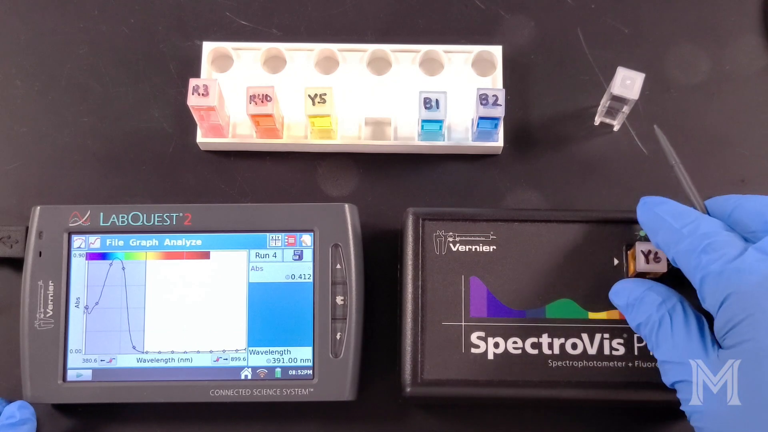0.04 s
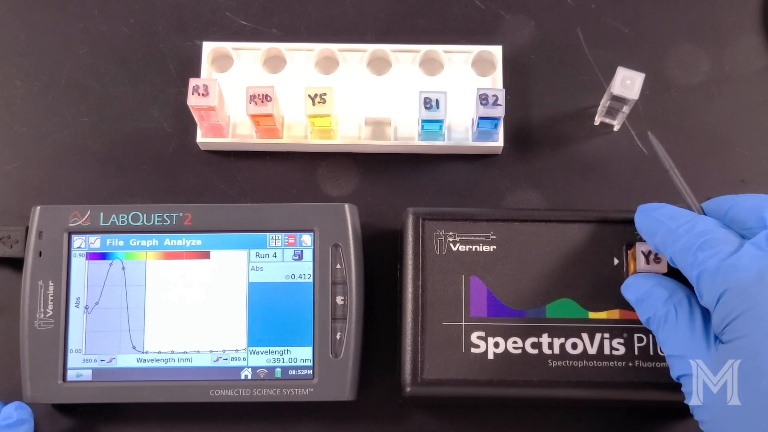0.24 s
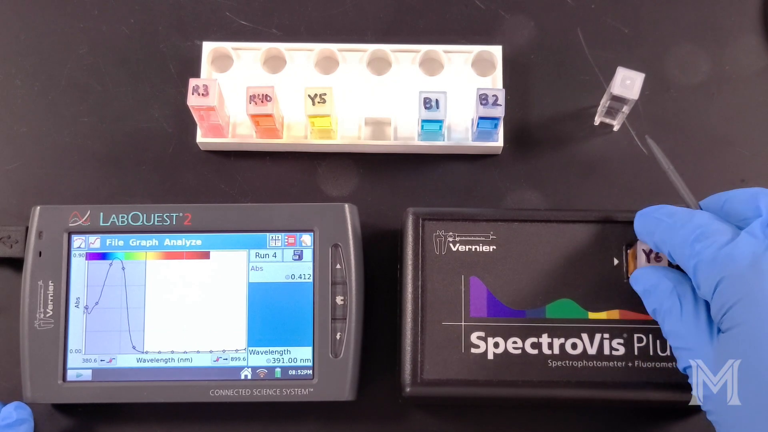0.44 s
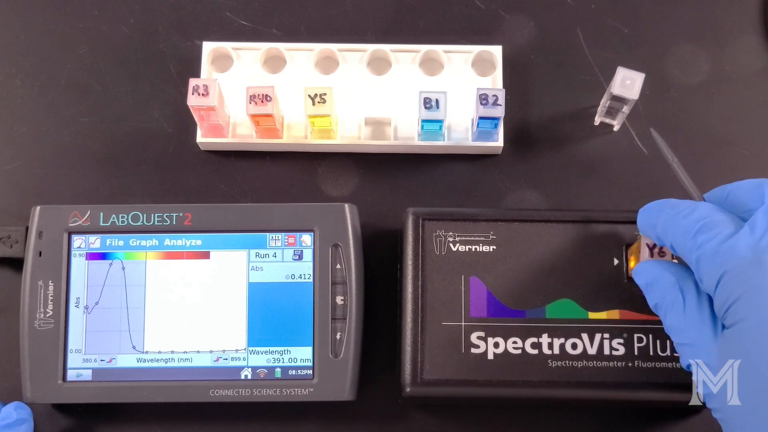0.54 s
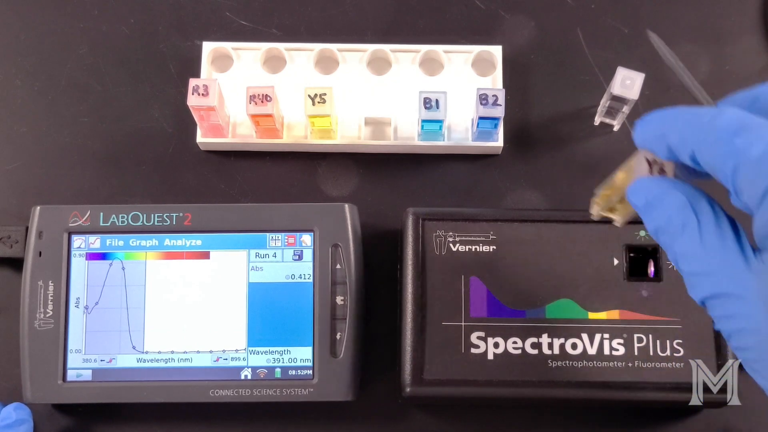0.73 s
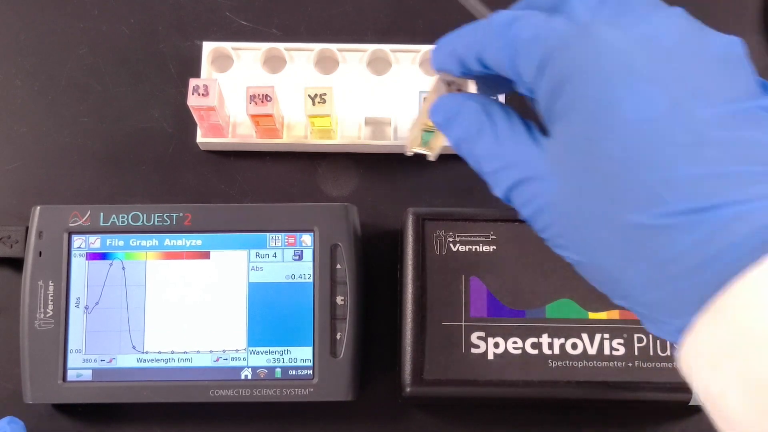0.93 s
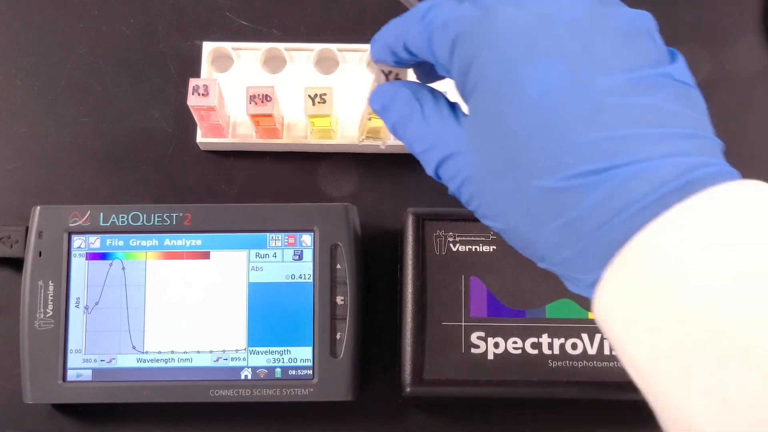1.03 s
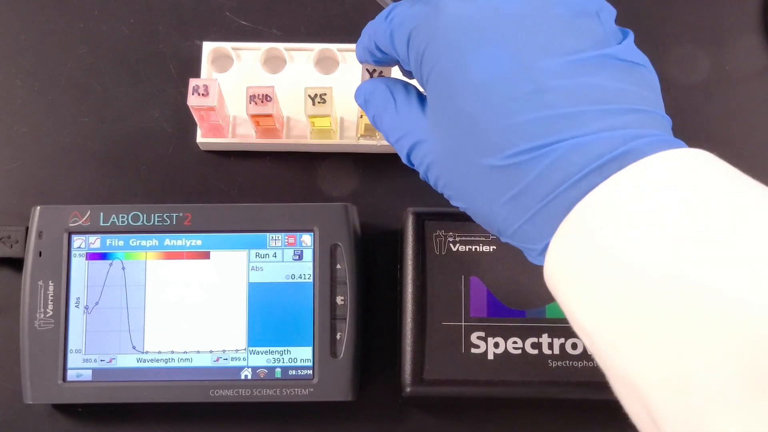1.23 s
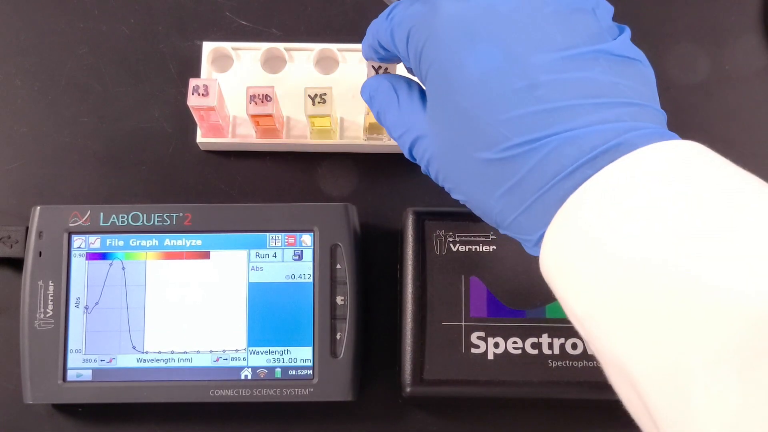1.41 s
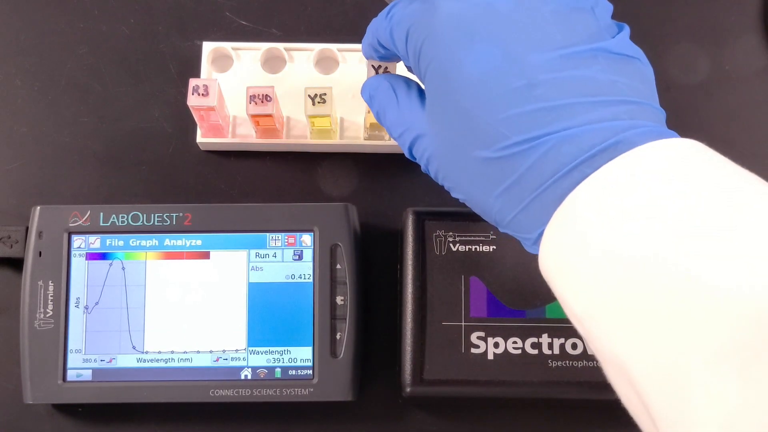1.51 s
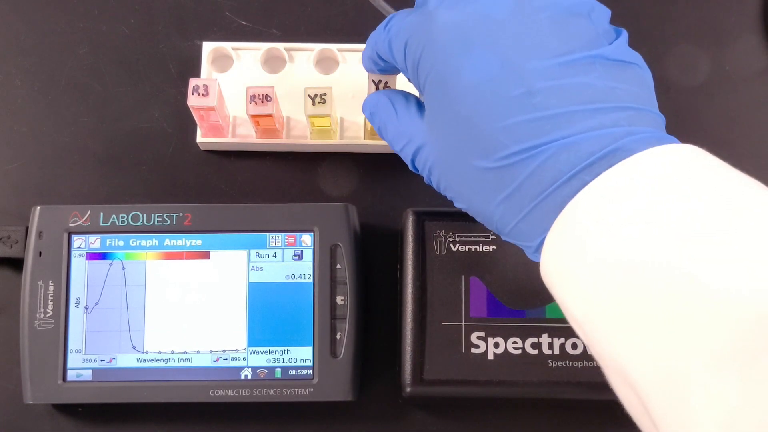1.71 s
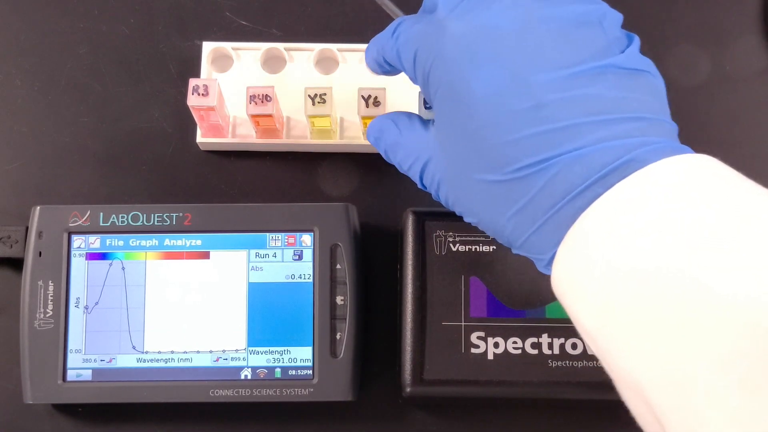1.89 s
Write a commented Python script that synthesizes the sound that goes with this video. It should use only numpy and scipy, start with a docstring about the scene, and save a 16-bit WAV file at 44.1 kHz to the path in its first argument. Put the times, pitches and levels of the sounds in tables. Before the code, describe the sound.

A small plastic vial clicks out of an instrument and knocks softly into a rack.

```python
"""Cuvette from well to rack

A quiet laboratory, a pair of microphones close to the bench, ventilation rumbling behind. A plastic
cuvette is worked loose in the well of a small instrument: its knocks and stick-slip creaks ring the
housing, then it scrapes up the wall and comes free with a click. A gloved hand carries it, the sleeve
brushing faintly, to a plastic rack, where it knocks a few times as it is seated."""
import sys
import numpy as np
from scipy import signal
from scipy.fft import rfft, irfft
from scipy.io import wavfile

SR = 44100
rng = np.random.default_rng(int(sys.argv[2]) if len(sys.argv) > 2 else 0)


def to_wav(sig):
    """Store sig (one row per channel, or 1-D mono) as 16-bit WAV at the path in sys.argv[1].

    Samples outside -1..1 are clipped; the rate is SR.
    """
    pcm = np.clip(np.atleast_2d(sig), -1, 1) * 32767
    pcm = np.round(pcm).astype(np.int16)
    wavfile.write(sys.argv[1], SR, pcm.T)  # frames by channels


N = 85995
TIME = np.arange(N) / SR

# Room tone of rumble and hiss. Each row: frequency in Hz, relative spectral level in dB.
AIR_SPECTRUM = [(15, -4), (30, -1.5), (42, -2.5), (55, 2.5), (70, 2), (100, -10), (170, -9), (250, -16.5),
                (400, -19), (800, -26.5), (1600, -31), (3200, -34), (6300, -42.5), (7300, -47.5),
                (9000, -45.5), (15500, -48.5)]
# How alike the air is at the two microphones. Each row: frequency in Hz, correlation from 0 to 1.
AIR_CORRELATION = [(50, 0.96), (125, 0.93), (250, 0.88), (600, 0.25), (2000, 0), (10000, 0)]
# Fan and mains hum. Each row: frequency in Hz, rms level in dB.
HUM_TONES = [(54.7, -56.5), (119.4, -65.5), (236.7, -67)]
# Colour of the room's tail. Each row: frequency in Hz, level in dB against the direct sound.
ROOM_TAIL = [(300, -28.5), (800, -10), (1500, -21.5), (3000, -1), (6000, -14.5), (14000, -11)]

# The sleeve passing the microphones. Each row: time in seconds, rms level in dB.
SLEEVE_LEVEL = [(.65, -89), (.85, -73), (1.0, -73.5), (1.2, -86), (1.35, -92)]
# Faint ticks of the glove. Each row: start in seconds, peak level in dB.
GLOVE_TOUCHES = [(0.023, -48), (0.0486, -60)]

# Modes of the rack, the instrument housing and the cuvette walls.
# Each row: frequency in Hz, relative level in dB, seconds to fall 60 dB.
RACK_MODES = [(486, -9.5, 0.075), (629, -13.5, 0.11), (712, -13, 0.12), (820, -5.5, 0.041),
              (935, -10.5, 0.031), (1140, -2.5, 0.08), (1270, 0.5, 0.026), (1401, 4.5, 0.039),
              (1540, -10, 0.022), (1800, -3.5, 0.039), (1950, -12, 0.029), (2430, -9.5, 0.023),
              (2900, -16, 0.02), (3280, -18, 0.023)]
HOUSING_MODES = [(347, -12, 0.073), (507, -2.5, .12), (798, -4.5, .15), (919.6, 6, 0.052), (1000, 0, 0.036),
                 (1181, 6, 0.063), (1301, -16, 0.12), (1613, -1, 0.069), (1717, -2.5, 0.081),
                 (1769, -2, 0.056), (1880, -9, 0.051), (2100, -28, 0.041), (2360, -17, 0.063)]
CUVETTE_MODES = [(3080, -18, 0.013), (3770, -1.5, 0.022), (4620, -3.5, 0.01), (5080, 5, 0.01),
                 (5700, 3, 0.015), (7750, -15, 0.0058), (9060, -17, .008), (11500, -7.5, 0.0047),
                 (11840, -2, 0.0074), (12070, -7, 0.0059), (13600, -6, .007)]

# The cuvette knocking in the rack and rocking in the well. Each row: start in seconds, peak level in dB,
# centre of the contact's band in Hz, its width in octaves, ring length factor, peak of the tick in dB.
RACK_CONTACTS = [(1.3695, -39, 1190, 3.4, 0.27, -52), (1.3715, -26, 1300, 1.7, 0.49, -51),
                 (1.4322, -42, 1070, 1.7, 0.53, -69), (1.4758, -18, 1572, 0.49, 0.073, -43.5),
                 (1.6898, -19.5, 1350, 1.12, 0.79, -47), (1.6929, -28, 1300, 2.2, 1.17, -51)]
WELL_CONTACTS = [(.3008, -31, 1440, 0.43, 0.2, -53.5), (.3032, -22.5, 1380, 1.18, 0.46, -51),
                 (.3052, -28.5, 1420, 1.07, 0.26, -60), (.5585, -32, 1430, 1, 0.36, -55),
                 (.5617, -18, 1400, 1.12, 0.49, -26), (.5632, -18, 1085, 1.32, 0.81, -31)]
# At the rack, a soft rough noise that swells just before the sharp knock, then faint rubbing before
# the last knocks. Each row: time in seconds, rms level in dB.
RACK_NOISE_LEVEL = [(1.35, -71.5), (1.465, -60.5), (1.54, -83), (1.575, -66), (1.63, -68), (1.685, -64.5),
                    (1.70, -81)]
# Stick-slip creaks in the well. Each row: start in seconds, length in seconds,
# level in dB (the peak is 3 dB higher), slips per second, centre of the band in Hz.
WELL_CREAKS = [(0.158, 0.011, -44.5, 865, 1410), (0.351, 0.011, -50, 820, 2480),
               (0.357, 0.0085, -42.5, 915, 700), (0.385, 0.009, -54, 890, 700),
               (0.421, .012, -51, 880, 800), (0.447, 0.021, -42, 875, 4960)]
# Pressure on the wall as the cuvette slides out. Each row: time in seconds, relative level in dB.
WALL_PRESSURE = [(.43, -26), (.46, -14), (.497, -11), (.515, -2), (.535, 2.5), (.546, -1.5), (.556, -4),
                 (.562, -29)]
# The gritty treble of the scrape. Each row: time in seconds, relative level in dB.
GRIT_LEVEL = [(.465, -28), (.503, -16), (.521, -2.5), (.54, 0.5), (.559, 0), (.563, -36)]

# Places in the stereo picture. Each pair: left minus right in dB, lag at the right microphone in ms.
HOUSING_PLACE, RACK_PLACE, TICK_PLACE = (0.22, 0.15), (-1.3, 0.063), (6.3, 0.081)
# Cycles that a mode takes to build up after a contact.
HOUSING_RISE_CYCLES, PLASTIC_RISE_CYCLES = 1.06, 0.39


def from_db(db):
    """Decibels to gain."""
    return 10 ** (np.asarray(db) / 20)


def rms_one(x):
    """Scale to unit rms."""
    return x / np.sqrt(np.mean(x ** 2) + 1e-20)


def peak_one(x):
    """Scale to unit peak."""
    return x / np.abs(x).max()


def fader(rows):
    """Gain along a dB curve, silent outside it."""
    return from_db(np.interp(TIME, *np.transpose(rows), left=-200, right=-200))


def per_bin(rows):
    """Read a table over log frequency at every spectral bin."""
    hz, value = np.transpose(rows)
    return np.interp(np.log(np.arange(N // 2 + 1) * SR / N + 1), np.log(hz), value)


def band(x, hz, octaves, order=2):
    """Band-pass around a centre."""
    edges = [hz / 2 ** (octaves / 2), min(hz * 2 ** (octaves / 2), SR / 2 - 1)]
    return signal.sosfilt(signal.butter(order, edges, "band", fs=SR, output="sos"), x + 1e-18)


def decay(t60):
    """Exponential fall of 60 dB in t60 seconds."""
    return np.exp(-np.log(1000) * np.minimum(TIME / t60, 10))


def through(x, response):
    """Play a signal through a response."""
    return signal.fftconvolve(x, response)[:N]


def at(start_s, x):
    """Start a sound at a given time."""
    return np.concatenate([np.zeros(int(start_s * SR)), x])[:N]


def place(x, where):
    """Level and arrival differences between the two microphones."""
    pan_db, lag_ms = where
    delayed = np.interp(TIME - lag_ms / 1000, TIME, x)
    return np.array([x * from_db(pan_db / 2), delayed * from_db(-pan_db / 2)])


def ventilation(air_db=-50, waver_depth=0.43, waver_hz=5):
    """Rumble and hiss, alike at both microphones in the bass, with a wavering hum."""
    mid, side = rfft(rng.standard_normal((2, N))) * from_db(per_bin(AIR_SPECTRUM))
    alike = np.clip(per_bin(AIR_CORRELATION), 0, 1)
    air = rms_one(irfft(np.sqrt(1 + alike) * mid + np.sqrt(1 - alike) * side * [[1], [-1]], N))
    slow = np.exp(-(np.arange(N // 2 + 1) * SR / N / waver_hz) ** 2)
    hum = 0
    for hz, db in HUM_TONES:
        swell, sway = waver_depth * rms_one(irfft(rfft(rng.standard_normal((2, N))) * slow, N))
        hum = hum + from_db(db) * rms_one((1 + swell) * np.sin(2 * np.pi * hz * TIME + sway))
    return from_db(air_db) * air + hum


def reflections(t60, build_s):
    """Dense echoes that build up and die away."""
    envelope = decay(t60) * (1 - np.exp(-TIME / build_s))
    return rng.standard_normal(N) * envelope / np.linalg.norm(envelope)


def room(direct, bench_db=-5):
    """Quick scatter off the bench and a short diffuse tail, different at each microphone."""
    channels = []
    for channel in direct:
        tail = reflections(t60=0.22, build_s=0.0027)
        tail = irfft(rfft(tail) * from_db(per_bin(ROOM_TAIL)), N)[:N // 2]
        bench = from_db(bench_db) * reflections(t60=0.025, build_s=0.006)
        channels.append(through(channel, tail) + through(channel, bench))
    return np.array(channels)


def sleeve_brush():
    """Cloth brushes past: a faint hiss, wide across the microphones."""
    hiss = band(rng.standard_normal((2, N)), hz=7750, octaves=2.7, order=1)
    return fader(SLEEVE_LEVEL) * rms_one(hiss)


def snap(hz, t60):
    """A light contact: a burst of noise in a narrow band."""
    return band(rng.standard_normal(N) * decay(t60), hz, octaves=0.75)


def glove_ticks():
    """The glove gives tiny, dry ticks."""
    return sum(at(start, from_db(db) * peak_one(snap(hz=3350, t60=0.0014)))
               for start, db in GLOVE_TOUCHES)


def ringing(modes, ring_length=1):
    """A body answers one tap: each mode swells and dies away, both times scaled by ring_length."""
    rise_cycles = HOUSING_RISE_CYCLES if modes is HOUSING_MODES else PLASTIC_RISE_CYCLES
    ring = 0
    for hz, db, t60 in modes:
        swell = 1 - np.exp(-TIME * hz / (rise_cycles * ring_length))
        ring = ring + from_db(db) * swell * decay(t60 * ring_length) * np.sin(2 * np.pi * hz * TIME)
    return ring


def knocks(contacts, modes, make_tick):
    """Each contact ticks and rings the body, coloured by its hardness and damped by the fingers."""
    body = ticks = 0
    for start, db, hz, octaves, ring_length, tick_db in contacts:
        ring = band(ringing(modes, ring_length), hz, octaves)
        body = body + at(start, from_db(db) * peak_one(ring))
        ticks = ticks + at(start, from_db(tick_db) * peak_one(make_tick()))
    return body, ticks


def grains(per_second=3000, spread_db=3):
    """Dense random impulses of uneven size."""
    sizes = from_db(spread_db * np.minimum(rng.exponential(1, N), 3)) * rng.choice([-1, 1], N)
    return sizes * (rng.random(N) < per_second / SR)


def rough_noise(response, envelope):
    """Grains of changing strength ring a body."""
    return through(rms_one(grains()) * envelope, response / np.linalg.norm(response))


def rack_seating():
    """The cuvette knocks into the rack with dull plastic snaps; a soft rough noise lies in between."""
    body, snaps = knocks(RACK_CONTACTS, RACK_MODES, lambda: snap(hz=2900, t60=0.015))
    damped_rack = band(ringing(RACK_MODES, ring_length=0.4), hz=1650, octaves=2.5)
    return body + rough_noise(damped_rack, fader(RACK_NOISE_LEVEL)), snaps


def well_creaks(jitter=0.032):
    """Short runs of nearly regular slips shake the housing."""
    housing = ringing(HOUSING_MODES, ring_length=0.79)
    creaks = 0
    for start, length, db, rate_hz, centre_hz in WELL_CREAKS:
        slip_times = np.cumsum(1 + jitter * rng.standard_normal(40)) / rate_hz
        pulses = np.zeros(N)
        pulses[(slip_times * SR).astype(int)] = np.sin(np.pi * np.minimum(slip_times / length, 1))
        creak = band(through(pulses, housing), centre_hz, octaves=1.9, order=1)
        creaks = creaks + at(start, np.sqrt(2) * from_db(db) * peak_one(creak))
    return creaks


def cuvette_tick(crack_band_hz=(2280, 12800), crack_db=12):
    """A hard edge catches: a brief crack and the high ring of the cuvette."""
    treble = signal.butter(3, crack_band_hz, "band", fs=SR, output="sos")
    crack = signal.sosfilt(treble, rng.standard_normal(N)) * decay(t60=0.0069)
    return peak_one(ringing(CUVETTE_MODES) + from_db(crack_db) * crack)


def well_scrape(body_db=-34.5, grit_db=-54.5, squeak_db=-56, low_cut_hz=720):
    """The cuvette drags up the well, its slips shaking the housing; near the top, grit and a squeak."""
    housing = band(ringing(HOUSING_MODES, ring_length=0.91), hz=1100, octaves=2.7)
    housing = signal.sosfilt(signal.butter(6, low_cut_hz, "high", fs=SR, output="sos"), housing)
    body = from_db(body_db) * rough_noise(housing, fader(WALL_PRESSURE))
    roughness = fader(GRIT_LEVEL)
    grit = from_db(grit_db) * rough_noise(cuvette_tick(), roughness)
    squeak = from_db(squeak_db) * rms_one(band(grains(), hz=5100, octaves=0.028)) * roughness
    return body, grit + squeak


def scene():
    """At the microphones: housing and rack near the centre, ticks to the left, the room all round."""
    well, well_ticks = knocks(WELL_CONTACTS, HOUSING_MODES, cuvette_tick)
    rack, rack_snaps = rack_seating()
    scrape, grit = well_scrape()
    glove = glove_ticks()
    sleeve = sleeve_brush()
    direct = (place(well + scrape + well_creaks(), HOUSING_PLACE)
              + place(rack, RACK_PLACE)
              + place(well_ticks + rack_snaps + grit + glove, TICK_PLACE))
    return direct + room(direct) + sleeve + ventilation()


def record(dry):
    """A steep low-pass at 15.8 kHz on both channels."""
    return signal.sosfilt(signal.ellip(12, .1, 80, 15800, fs=SR, output="sos"), dry)


dry = scene()
out = record(dry)
to_wav(out)
```